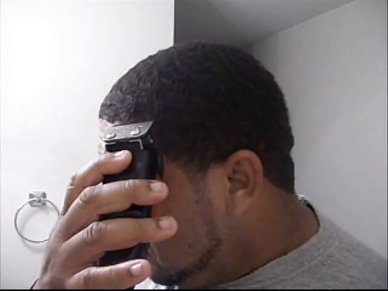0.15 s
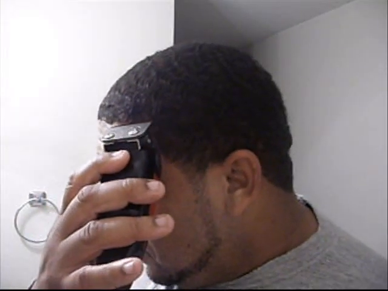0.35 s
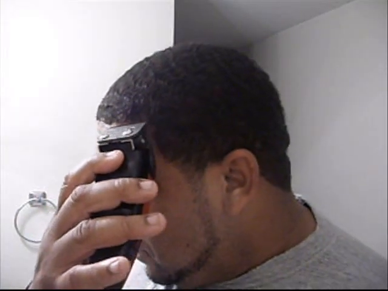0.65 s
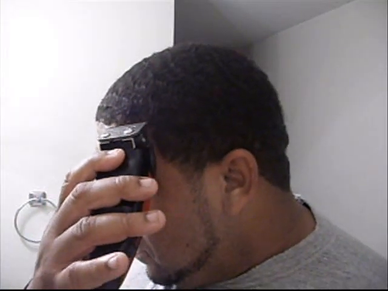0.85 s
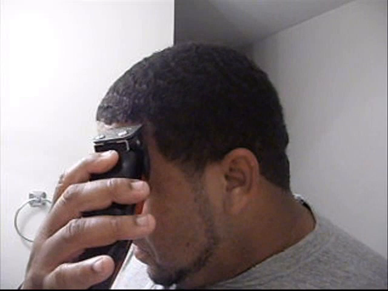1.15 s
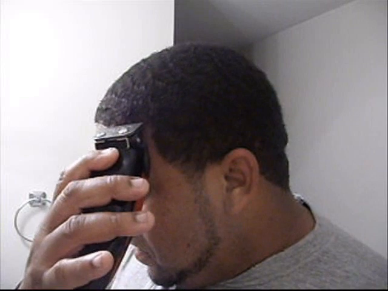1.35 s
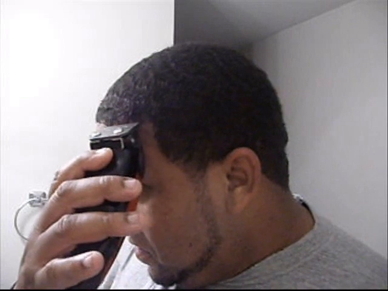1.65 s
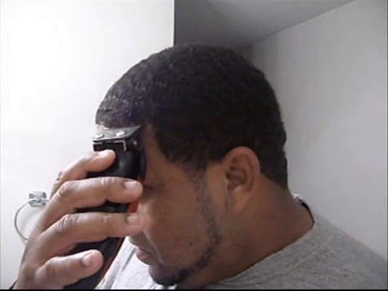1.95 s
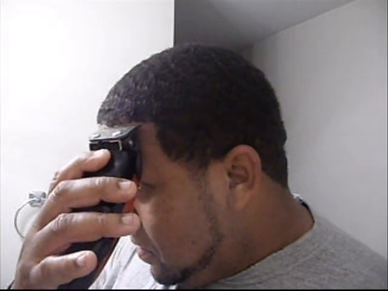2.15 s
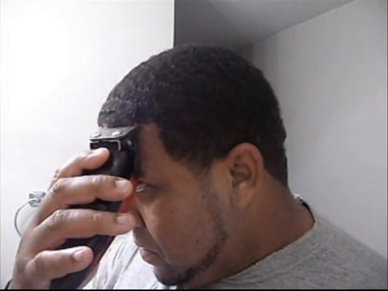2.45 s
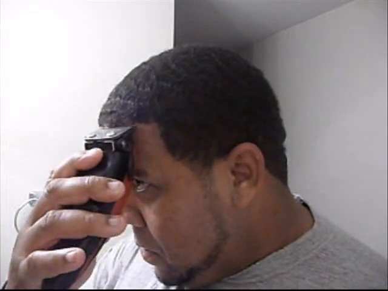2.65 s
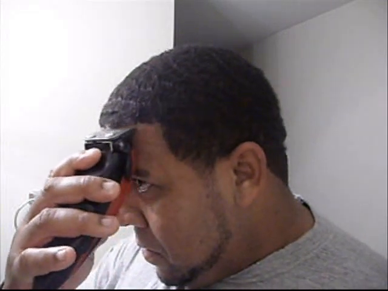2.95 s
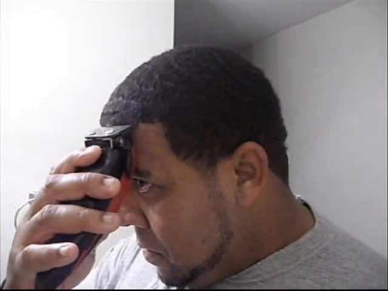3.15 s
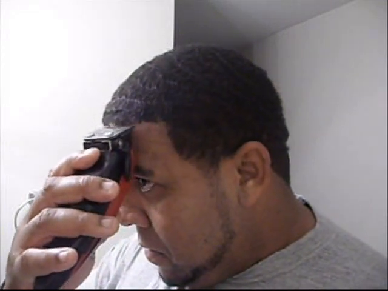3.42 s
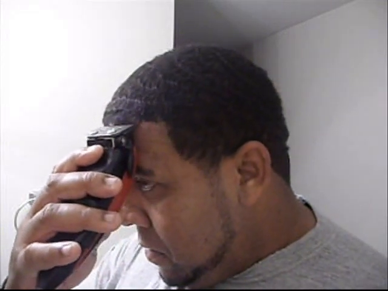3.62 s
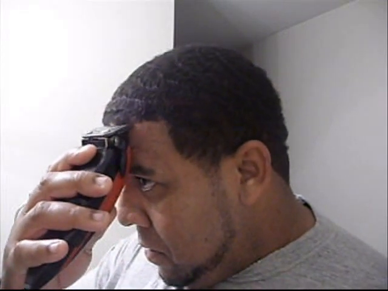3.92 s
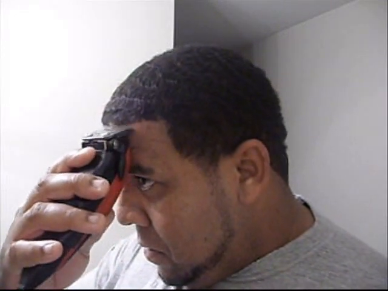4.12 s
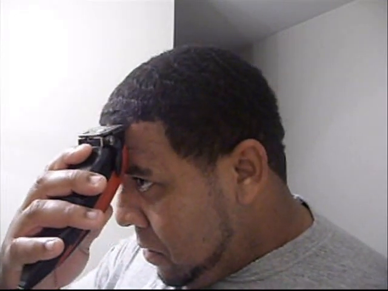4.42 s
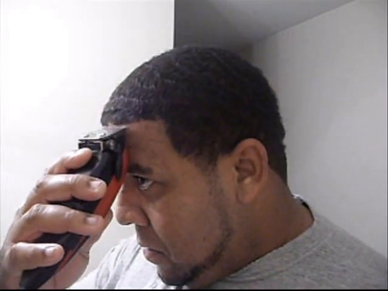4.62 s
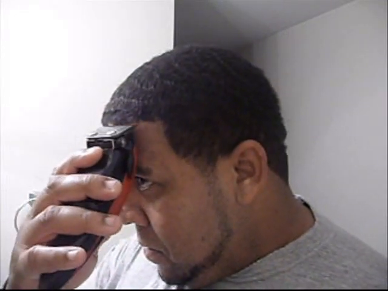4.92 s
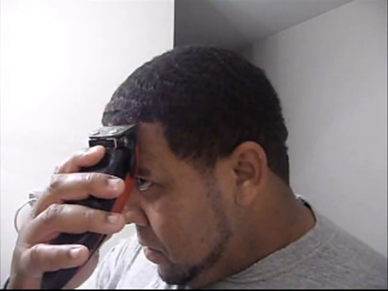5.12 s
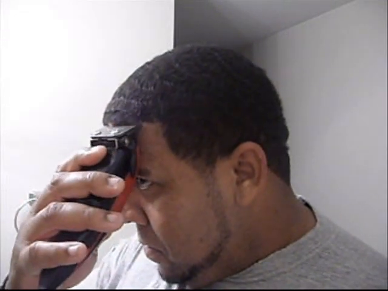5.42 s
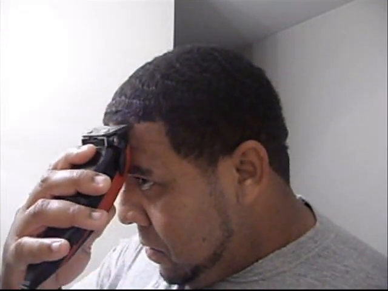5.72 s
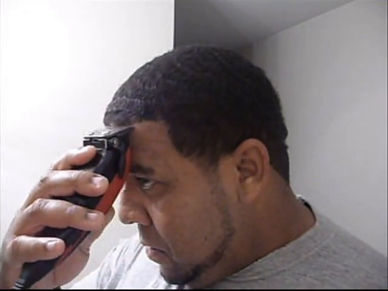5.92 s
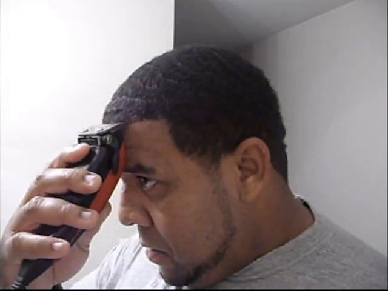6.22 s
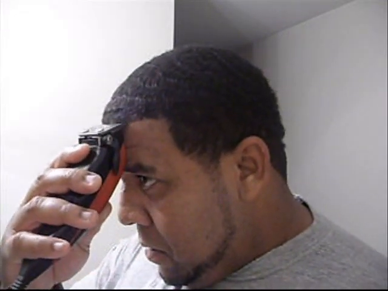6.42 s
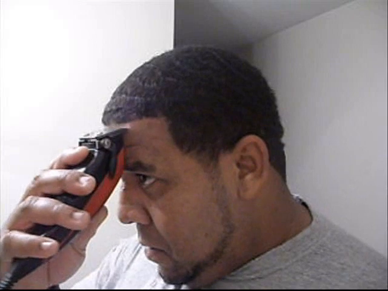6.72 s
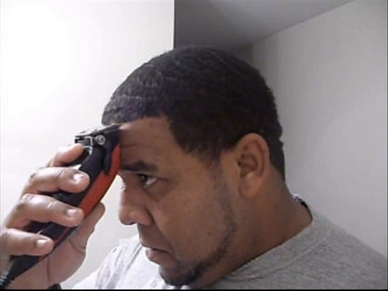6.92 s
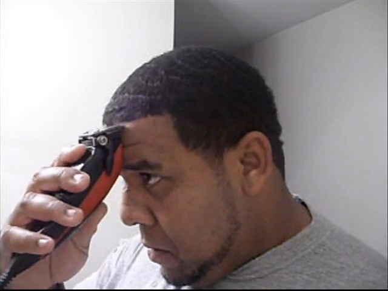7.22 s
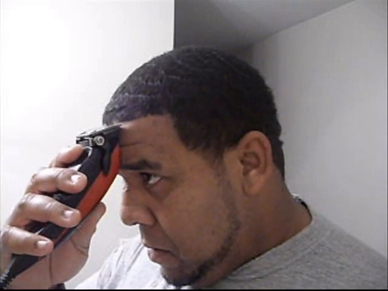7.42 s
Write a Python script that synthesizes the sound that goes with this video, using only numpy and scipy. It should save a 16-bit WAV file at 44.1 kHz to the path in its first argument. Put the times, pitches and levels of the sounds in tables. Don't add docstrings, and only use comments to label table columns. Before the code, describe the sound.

Electric hair clippers are already running at 0 s and never stop: a steady low hum around 120 Hz with buzzing metallic overtones that shift slightly as the hand and load change. Over it, blades rasp through hair in dry crackling passes of roughly 0.2 to 0.4 s, starting at 0, 0.5, 1.0, 1.5, 2.1, 2.5 and a strong one at 2.8 s. A sharp comb click comes at 3.05 s, weaker ones at 3.13 and 3.27. Passes grow lighter from 3.3 to 4.4 s, then a faint one slowly swells from 4.7 to 5.2. A single loud click at 5.43 s leads into a thin wavering whistle of teeth on skin, about 3.6 kHz, until 5.95. Short rasps with tiny snagging bursts continue from 5.9 to the end, about 7.5 s. Small hard room, cheap close microphone, constant soft hiss, faint electrical buzz, grainy mirrored treble, identical in both channels.

```python
import sys
import numpy as np
from scipy import signal
from scipy.fft import rfft, irfft
from scipy.io import wavfile
from scipy.ndimage import uniform_filter1d

SR = 44100
rng = np.random.default_rng(int(sys.argv[2]) if len(sys.argv) > 2 else 0)


def int16_out(signal):
    q = np.round(np.clip(np.atleast_2d(signal).T, -1, 1) * 32767)
    wavfile.write(sys.argv[1], SR, q.astype(np.int16))


def invert_db(level):
    return 10 ** (np.asarray(level, dtype=float) / 20)


N = 333837
TIME = np.arange(N) / SR
COARSE_HOP = 32
COARSE_S = TIME[::COARSE_HOP]

STROKE_HZ = 120.12
HOLD_HZ, TOP_HZ = 11032.5, 15725
RATTLE_T60_S = 0.14
SQUEEZE_OCTAVES = 0.17
BITE_S, LIFT_S = 0.074, 0.085
HISS_DB = -49.5
IDLE_DB, IDLE_LOW_DB, IDLE_TOP_DB, TOP_SHARE_DB = -62, -55.5, -63, -8.5

# tone_hz, level_db (rms)
BUZZ_TONES = [(20.9, -65), (30.0, -75), (53.6, -80), (60.0, -70), (90.1, -74), (107.3, -80), (150.2, -76),
              (180.2, -79), (210.2, -79), (300.3, -78), (390.4, -85)]
# freq_hz, density_db (per Hz)
HISS_SPECTRUM = [(15, -3), (30, -5.5), (70, 3), (150, 1.5), (350, 0.5), (600, 4), (1000, 0), (1500, -2),
                 (2500, 6.5), (4000, 3.5), (5200, 4.5), (5500, 1)]
# start_s, peak_db, ring_hz, burst_s, rattle_db (re peak)
COMB_CLICKS = [
    (3.051, -29, 3180, 0.0058, -7),
    (3.128, -40, 3290, 0.0056, -7),
    (3.27, -43.5, 2900, 0.006, -3),
    (5.4285, -31.5, 3230, 0.0055, -8),
]
# time_s, pitch_hz, level_db
SKIN_WHISTLE = [
    (5.46, 3500, -75),
    (5.52, 3520, -58),
    (5.62, 3640, -56),
    (5.72, 3670, -53),
    (5.9, 3640, -53.5),
    (5.95, 3640, -75),
]
# order (multiple of stroke rate), level_db (rms)
LINE_LEVELS = [(1, -48.5), (2, -57.5), (4, -76), (5, -62), (7, -65), (8, -77), (9, -65), (10, -72),
               (11, -60), (12, -69), (13, -59), (14, -69), (15, -68), (16, -71), (17, -60), (18, -68),
               (19, -60), (20, -76), (21, -70), (22, -66), (23, -72), (24, -67), (25, -77), (26, -71),
               (27, -70), (28, -69), (29, -74), (30, -70), (31, -73), (32, -75)]
# order, drift_db_per_s, follow_db_per_db, wander_db
LINE_BEHAVIOUR = [(1, .25, 0, .1), (2, .02, .02, .2), (5, -.55, .12, .3), (7, 1.0, .2, .5),
                  (9, 1.15, .2, .5), (11, .35, -.05, .4), (13, .55, .25, .5), (14, -.1, .6, 1.2),
                  (17, -.2, .35, .8), (19, -.5, 0, .8), (22, -.6, .6, 1.5)]
# centre_s, length_s, change_db, resonance_hz
HAND_SQUEEZES = [(0.197, 0.25, -9, 2040), (0.653, 0.67, -12, 1980), (.62, 0.17, 5, 1560),
                 (1.197, 0.1, 6.5, 1580), (1.205, 0.098, 3, 2280), (2.19, .18, 11, 1560),
                 (2.61, .14, 6.5, 1560), (2.973, .16, 14, 960), (2.886, 0.12, 11, 2170),
                 (3.1, 0.13, 5, 2160), (3.355, 0.08, 8.5, 1550), (3.766, 0.087, 3, 1280),
                 (4.05, 0.22, 4.5, 2250), (4.2, 0.12, 6, 1530), (4.5, 0.27, -5, 1060),
                 (4.65, 0.54, 3, 2250), (5.03, 0.17, 7.5, 1570), (5.294, .08, 8, 2040),
                 (5.52, 0.099, 5, 1550), (5.5, 0.33, 5, 2300), (5.652, .14, -10, 2130),
                 (6.198, 0.11, 10, 1560), (6.2, 0.12, 6.5, 1980), (6.42, 0.12, 8.5, 1100),
                 (6.98, 0.12, 2.5, 1080), (7.348, .2, 1.5, 1080), (6.877, 0.17, 2.5, 1570),
                 (6.92, .25, -12, 2280), (7.285, 0.57, 5.5, 1570), (7.3, 0.15, -8, 2300)]
# start_s, length_s, rasp_db, sag_db (to the end), low_ring_db (re rasp)
HAIR_PASSES = [(-.05, 0.39, -48, -7.5, 1), (0.492, 0.43, -47, -7, -1), (1.026, 0.22, -48, -8, -2.5),
               (1.476, 0.33, -44, -3, -1), (2.065, 0.28, -48, -2, -0.5), (2.475, 0.22, -52, 2, 0),
               (2.796, 0.353, -43, -7.5, 1), (3.115, 0.23, -51, -8, -11), (3.29, 0.29, -51.5, .5, -2.5),
               (3.777, .12, -53, -2, -3), (4.08, 0.32, -54.5, 0.5, -1.5), (4.68, 0.56, -66, 10.5, -10),
               (5.48, 0.46, -52.5, -3.5, -3), (5.918, 0.21, -49, 1, -4), (6.267, 0.29, -52.5, -3.5, -7),
               (6.73, 0.29, -50.5, -5.5, -2.5), (7.243, .18, -48.5, -6.5, 0.5), (7.447, .2, -55.5, -5, -1)]
# centre_s, extra_rasp_db, extra_low_db, extra_top_db, length_s
CAUGHT_TUFTS = [(.57, -0.5, 0, 1.5, 0.067), (0.773, 4, -2, -3, 0.036), (1.08, 1.5, -1, 5, .09),
                (1.605, 5, -2.5, 0, 0.087), (2.094, 6, -1.5, -3, 0.064), (2.867, 5.5, -6, -1, 0.043),
                (3.865, 4, -1, -1, 0.034), (4.287, 4, -3, -3, 0.037), (5.107, 4, 2.5, -3, .05),
                (5.284, 8.5, 2, -2, 0.038), (6.017, 6, 0, .5, 0.032), (6.237, 5, 4, -1, 0.025),
                (6.42, 3.5, 3, 0, 0.031), (6.806, 0, 7, -2, 0.028), (6.918, 2, 4, -1, 0.036),
                (7.026, 7.5, 2, -1, 0.034), (7.411, 10, -6, -4, 0.036)]
# freq_hz, width_hz, level_db
LOW_MODES = [(998, 630, -7), (1564, 570, 1.5), (2152, 266, 2)]
# freq_hz, width_hz, level_db
MID_MODES = [(2690, 380, 1.5), (3300, 530, 1.4), (3988, 510, 0.33)]
# freq_hz, width_hz, level_db
TOP_MODES = [(4367, 860, -1.5), (5197, 550, -0.42)]


def level(x, db):
    return x * invert_db(db) / np.sqrt(np.mean(x ** 2))


def walk(rate_hz, hop=1):
    hold, count = int(SR / hop / rate_hz), -(-N // hop)
    steps = np.repeat(rng.standard_normal(count // hold + 1), hold)
    return 1.3 * uniform_filter1d(uniform_filter1d(steps, hold), hold)[:count]


def ring(x, modes):
    out = 0
    for k, (hz, width_hz, db) in enumerate(modes):
        b, a = signal.iirpeak(hz, hz / width_hz, fs=SR)
        once = signal.lfilter(b, a, x)
        out = out + (-1) ** k * invert_db(db) * signal.lfilter(b, a, once)
    return level(out, 0)


def background():
    hz, db = np.transpose(HISS_SPECTRUM)
    bins_hz = np.fft.rfftfreq(N, 1 / SR)
    shape = invert_db(np.interp(np.log(bins_hz + 1), np.log(hz), db)) * (bins_hz < HOLD_HZ / 2)
    hiss = irfft(rfft(rng.standard_normal(N)) * shape, N)
    tones = 0
    for tone_hz, tone_db in BUZZ_TONES:
        tones = tones + np.sqrt(2) * invert_db(tone_db) * np.sin(2 * np.pi * (tone_hz * TIME + rng.random()))
    return level(hiss, HISS_DB) + tones


def comb():
    out = np.zeros(N)
    age_s = np.arange(SR // 5) / SR
    for start_s, db, hz, burst_s, rattle_db in COMB_CLICKS:
        rise = np.clip(age_s / burst_s, 0, 1)
        burst = np.sin(np.pi * rise) * np.sin(2 * np.pi * hz * age_s)
        noise = ring(rng.standard_normal(len(age_s)), [(hz, 700, 0)])
        rattle = invert_db(rattle_db - 60 * age_s / RATTLE_T60_S) * noise * rise
        start = int((start_s - burst_s / 3) * SR)
        out[start:start + len(age_s)] += invert_db(db) * (burst + rattle)
    return out


def slide():
    time_s, pitch_hz, level_db = np.transpose(SKIN_WHISTLE)
    hz = np.interp(TIME, time_s, pitch_hz)
    db = np.interp(TIME, time_s, level_db)
    waver_hz, flutter_db = 32 * walk(80), 1.6 * walk(40)
    return invert_db(db + flutter_db) * np.cos(2 * np.pi * np.cumsum(hz + waver_hz) / SR)


def motor(turn, load_db, wobble_db=0.04, drift_rad=0.03):
    rules = np.array(LINE_BEHAVIOUR)
    load_db = uniform_filter1d(load_db, size=60)
    centre_s, length_s, squeeze_db, hz = np.transpose(HAND_SQUEEZES)[:, :, None]
    squeeze_db = squeeze_db * np.exp(-(2 * (COARSE_S - centre_s) / length_s) ** 2)
    out = 0
    for order, db in LINE_LEVELS:
        nearest = np.argmin(abs(order - rules[:, 0]))
        _, slope_db, follow, wander_db = rules[nearest]
        near = np.exp(-(np.log2(order * STROKE_HZ / hz) / SQUEEZE_OCTAVES) ** 2)
        wander = wander_db * (walk(4, COARSE_HOP) + walk(9, COARSE_HOP))
        change_db = slope_db * COARSE_S + follow * load_db + wander + (near * squeeze_db).sum(axis=0)
        change_db = change_db - 10 * np.log10(np.mean(invert_db(2 * change_db)))
        loose = min(order, 14)
        gain = invert_db(db + change_db + wobble_db * loose * walk(14, COARSE_HOP))
        phase = 2 * np.pi * rng.random() + drift_rad * loose * walk(6, COARSE_HOP)
        line = np.cos(order * turn + np.interp(TIME, COARSE_S, phase))
        out = out + np.interp(TIME, COARSE_S, gain) * line
    return np.sqrt(2) * out


def load():
    cut, low = 0, 0
    for start_s, length_s, db, sag_db, low_db in HAIR_PASSES:
        age_s = COARSE_S - start_s
        edge = np.clip(np.minimum(age_s / BITE_S, (length_s - age_s) / LIFT_S), 0, 1)
        sagged = invert_db(db + sag_db * np.clip(age_s / length_s, 0, 1))
        power = (np.sin(edge * np.pi / 2) * sagged) ** 2
        cut = cut + power
        low = low + power * invert_db(2 * low_db)
    top = cut * invert_db(2 * TOP_SHARE_DB)
    powers = np.array([cut, low, top])
    idle_db = np.array([[IDLE_DB], [IDLE_LOW_DB], [IDLE_TOP_DB]])
    rings_db = 10 * np.log10(powers + invert_db(2 * idle_db))
    for centre_s, more_db, low_db, top_db, length_s in CAUGHT_TUFTS:
        bump = np.exp(-(2 * (COARSE_S - centre_s) / length_s) ** 2)
        rings_db = rings_db + (more_db + np.array([[0], [low_db], [top_db]])) * bump
    return rings_db


def chatter(turn):
    place = turn / (2 * np.pi) % 1 * 255
    patterns = rng.standard_normal((2, 256))
    first, second = (np.interp(place, np.arange(256), p) for p in patterns)
    share_rad = 1.58 * walk(12)
    return level(np.cos(share_rad) * first + np.sin(share_rad) * second, 0)


def rasp(turn, cut_db, low_db, top_db, scatter_db=2.5, gate=0.24):
    sizes = np.minimum(rng.exponential(size=N // 8 + 1), 4)
    size_db = scatter_db * np.repeat(sizes, 8)[:N]
    snaps = level(rng.standard_normal(N) * invert_db(size_db), 0)
    stroke_gate = 1 + gate * np.cos(2 * turn) + 0.19 * np.cos(4 * turn)
    snaps = snaps * stroke_gate * invert_db(0.83 * walk(40))
    knocks = invert_db(-6.5) * chatter(turn)
    push = snaps + knocks
    low = invert_db(low_db - 1.5) * ring(snaps + invert_db(-11) * knocks, LOW_MODES)
    mid = invert_db(cut_db - 1.0) * ring(push, MID_MODES)
    top = invert_db(top_db + 2.5) * ring(push, TOP_MODES)
    return low + mid + top


def scene():
    turn = 2 * np.pi * STROKE_HZ * TIME
    rings_db = load()
    blades = rasp(turn, *(np.interp(TIME, COARSE_S, db) for db in rings_db))
    mono = background() + comb() + slide() + motor(turn, rings_db[0]) + blades
    return np.array([mono, mono])


def roll_off(x):
    return signal.sosfilt(signal.butter(12, 15960, fs=SR, output="sos"), x)


def record(dry, step_db=-62):
    slow = signal.resample(dry[0], round(N * HOLD_HZ / SR))
    slow = slow + invert_db(step_db) * np.sign(slow)
    slow = slow - slow.mean()
    held = slow[np.minimum((TIME * HOLD_HZ).astype(int), len(slow) - 1)]
    held = irfft(rfft(held) * (np.fft.rfftfreq(N, 1 / SR) < TOP_HZ), N)
    return roll_off(np.array([held, held]))


dry = scene()
out = record(dry)
int16_out(out)
```